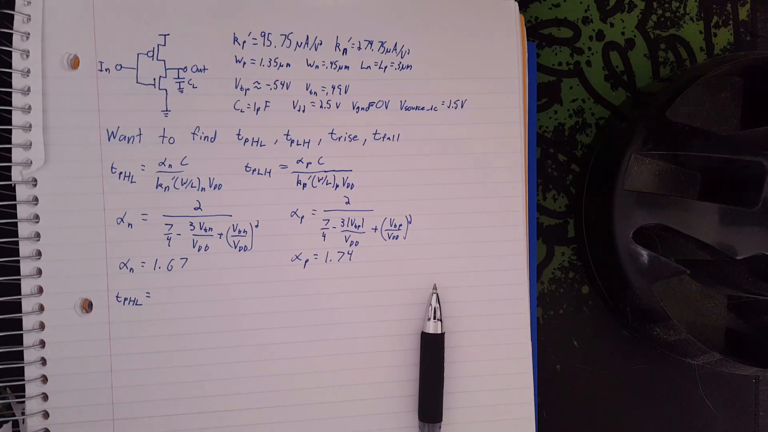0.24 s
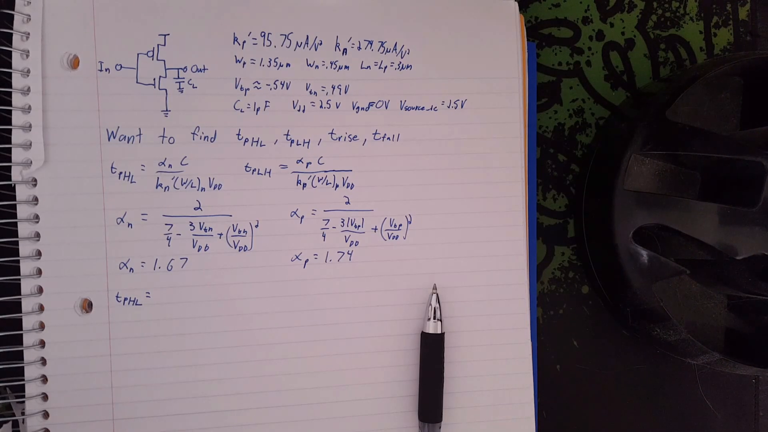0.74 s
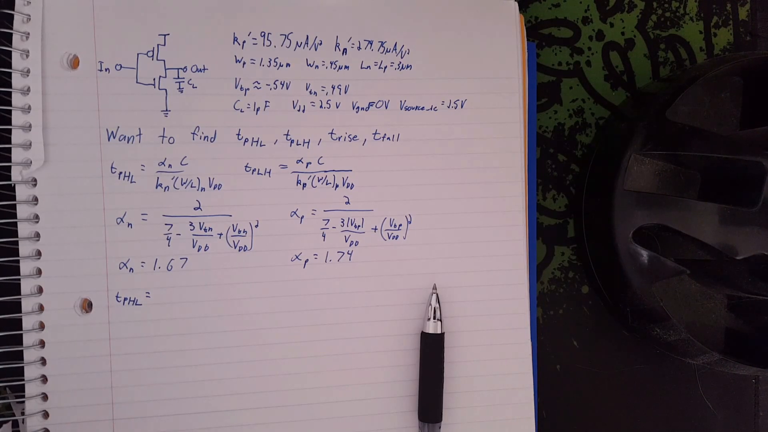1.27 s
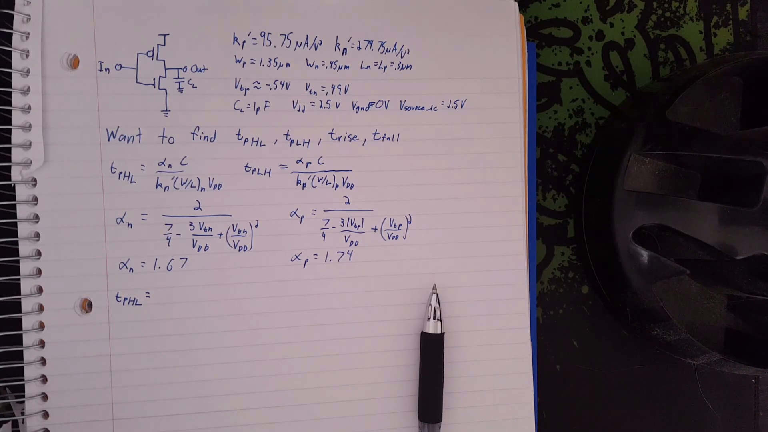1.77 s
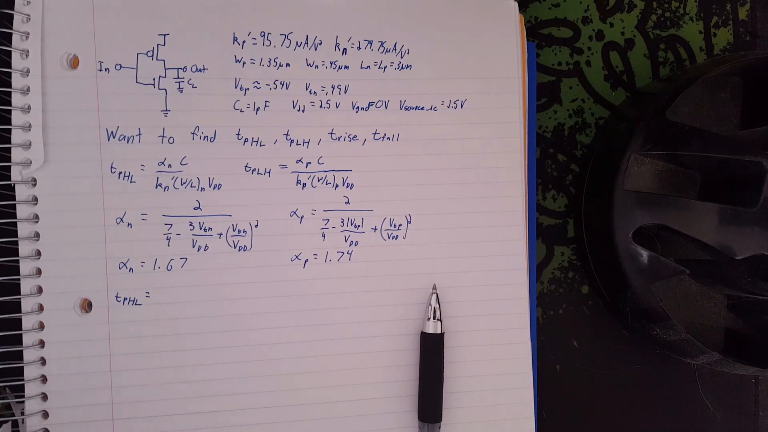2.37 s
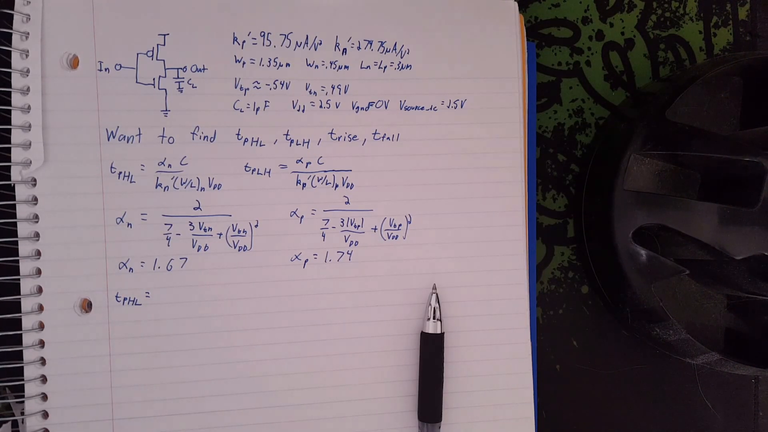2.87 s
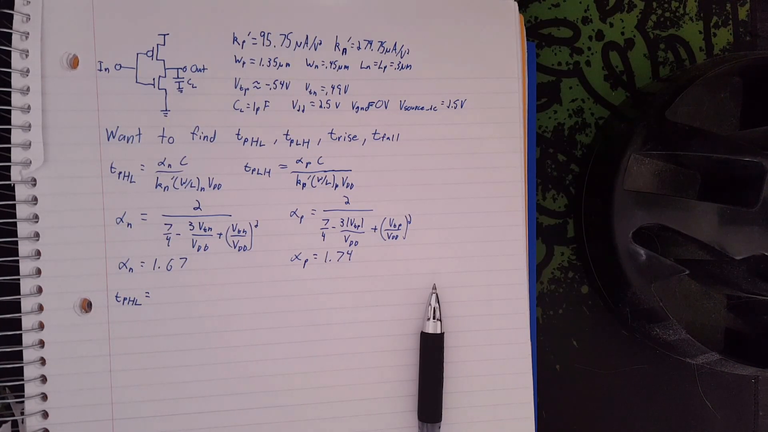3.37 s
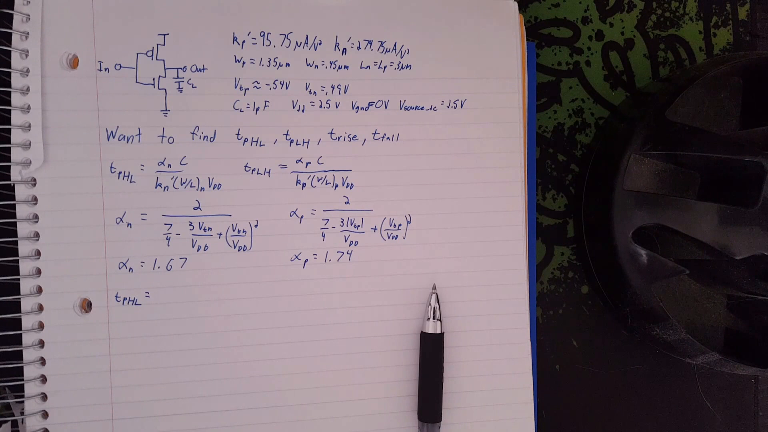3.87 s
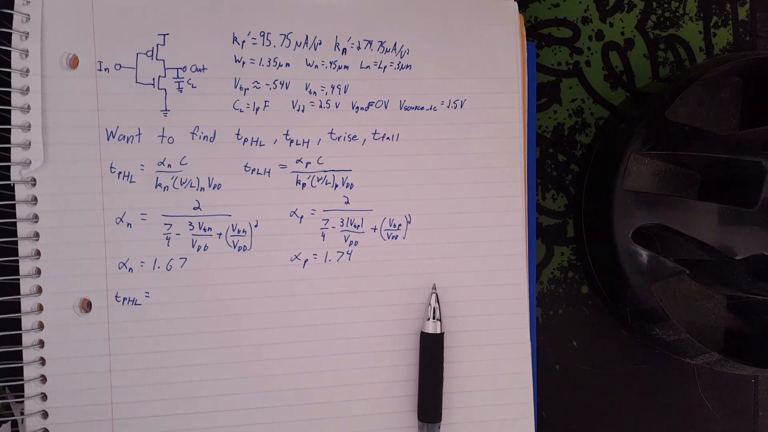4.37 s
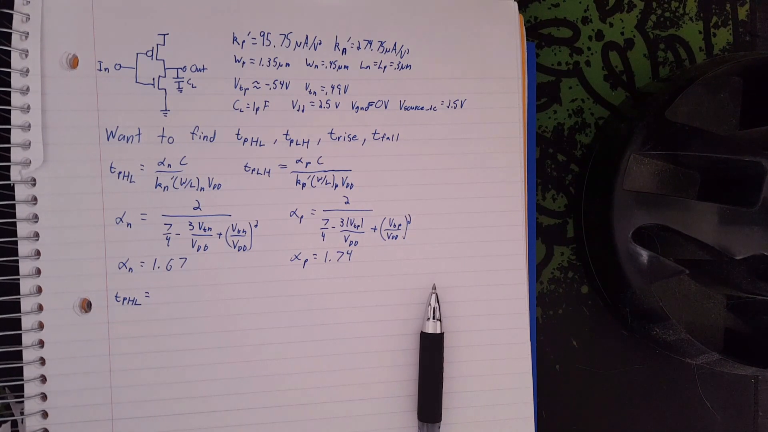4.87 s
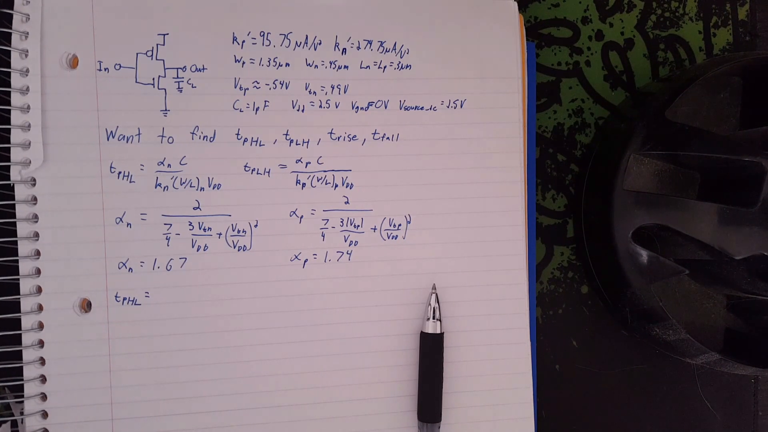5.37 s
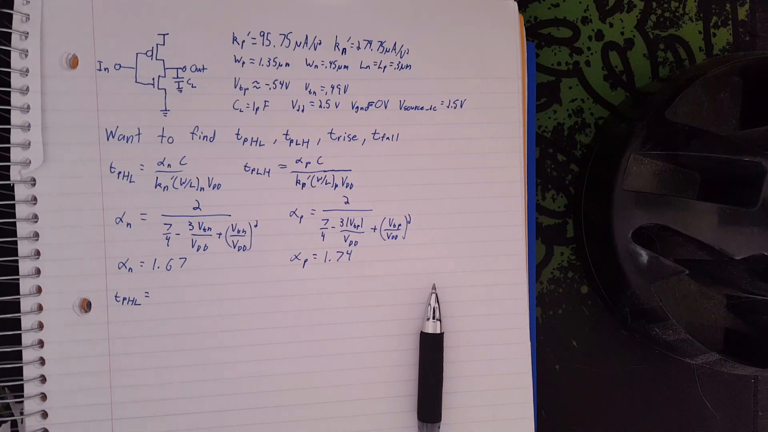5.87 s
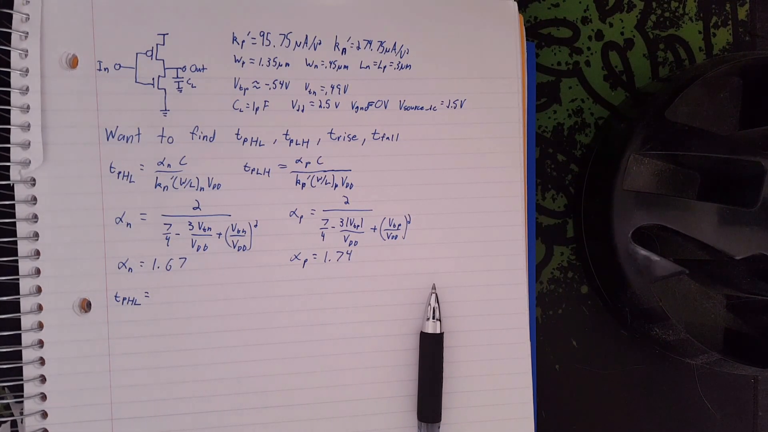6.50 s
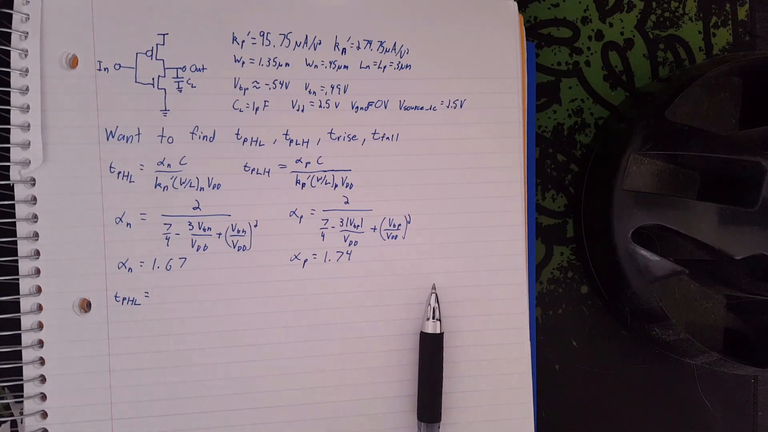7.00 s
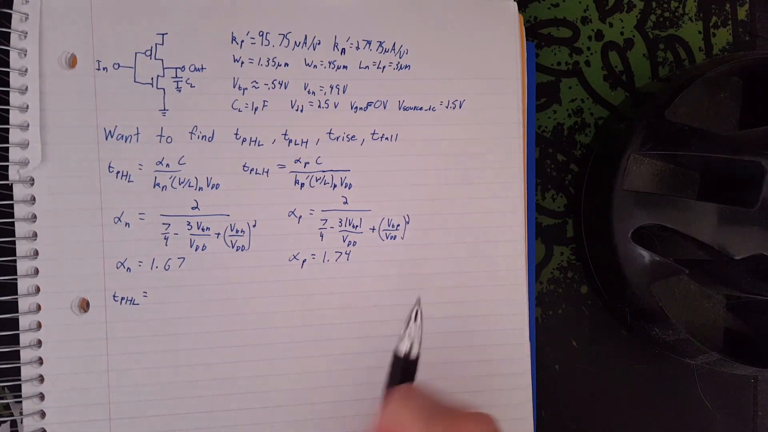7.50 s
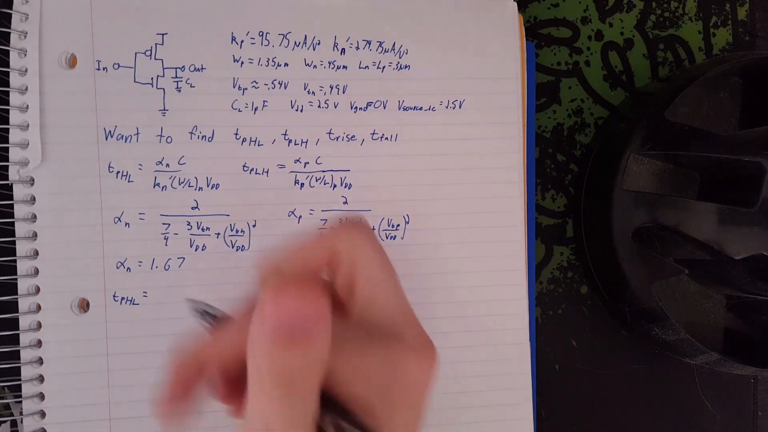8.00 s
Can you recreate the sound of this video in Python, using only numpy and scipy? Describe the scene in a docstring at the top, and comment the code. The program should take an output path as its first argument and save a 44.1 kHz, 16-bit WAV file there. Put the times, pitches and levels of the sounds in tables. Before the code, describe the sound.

Small calculator keys click unevenly in a quiet humming room as a far engine swells and fades, then a pen scrapes up and something knocks hard on the desk.

```python
"""Calculator keys in a quiet room

Calculator keys are pressed and let go beside two microphones: short dying rings, with a noise tick on release.
A low hum and hiss lie beneath. A far engine, made of shaped noise and wavering sines, swells and fades.
Then a hand picks a pen off a notebook (grainy noise and plastic ticks), and something hard is set down
on the desk: dying desk rings with snaps of noise. Sparse echoes add the room to keys, knocks and pen."""
import sys
import numpy as np
from scipy import signal
from scipy.fft import rfft, irfft
from scipy.io import wavfile
from scipy.ndimage import uniform_filter1d

SR = 44100
rng = np.random.default_rng(int(sys.argv[2]) if len(sys.argv) > 2 else 0)


def materialize(psi):
    """Save the field psi as 16-bit PCM at rate SR to the path in sys.argv[1].

    A 1-D psi becomes a single channel; in a 2-D psi each row is a channel.
    """
    bounded = np.clip(np.atleast_2d(psi).T, -1, 1)
    quanta = np.round(bounded * 32767).astype(np.int16)
    wavfile.write(sys.argv[1], SR, quanta)


N = 363820  # length of the scene in samples
LAG = 14  # samples by which the right microphone hears later


def amp(db):
    """Turn decibels into a plain gain."""
    return 10 ** (np.asarray(db) / 20)


def evened(x):
    """Scale to an overall RMS of 1."""
    return x / np.sqrt(np.mean(x ** 2) + 1e-20)


def read(points, hz):
    """Read a two-column curve at any frequency, along a logarithmic pitch axis."""
    f, value = np.transpose(points)
    return np.interp(np.log(hz + 1), np.log(f + 1), value)


def add(mix, s, sound):
    """Mix a sound in at s seconds, cut off where the scene ends."""
    part = mix[:, round(s * SR):][:, :sound.shape[1]]
    part += sound[:, :part.shape[1]]


def later(x):
    """Sound reaches the right microphone a little later than the left."""
    return np.array([x[0], np.roll(x[1], LAG)])


def blend(a, b, same):
    """Keep a on the left; on the right mix in as much of the unrelated b as the likeness leaves."""
    same = np.clip(same, -1, 1)
    return np.array([a, same * a + np.sqrt(1 - same ** 2) * b])


# How alike steady noise is at the two microphones. Each row: frequency in Hz, left-right likeness (1 is identical).
LIKENESS = [(150, 0.97), (300, 0.53), (600, 0.8), (1200, 0.47), (3000, 0.0097), (9000, 0.015)]


def noise(colour, patchy_db, size=2048):
    """Two-channel noise from random short-time spectra; colour maps Hz to gain."""
    frames, hz = 4 * N // size + 5, np.fft.rfftfreq(size, 1 / SR)
    a, b, c, d, patches = rng.standard_normal((frames, len(hz), 5)).T
    # smoothed over pitch and time, the patches make the noise uneven
    patches = uniform_filter1d(patches, size=9, axis=0)
    patches = evened(uniform_filter1d(patches, size=9, axis=1))
    spectra = blend(a + 1j * b, c + 1j * d, read(LIKENESS, hz)[:, None])
    spectra *= colour(hz)[:, None] * amp(patchy_db * patches)
    return evened(signal.istft(spectra, nperseg=size, noverlap=3 * size // 4)[1][:, :N])


def wander(slowest_hz, fastest_hz, count):
    """A smooth random drift: slow sines with random starting points, RMS 1."""
    t = np.arange(N) / SR
    speeds = np.geomspace(slowest_hz, fastest_hz, num=count)
    return evened(sum(np.sin(2 * np.pi * (f * t + rng.random())) for f in speeds))


def tone(hz, db, waver_db):
    """A sine whose level wanders, in parts up to a few times a second."""
    level = np.sqrt(2) * amp(db + waver_db * wander(.4, 7, 12))
    cycles = np.cumsum(hz + np.zeros(N)) / SR
    return level * np.sin(2 * np.pi * (cycles + rng.random()))


def ring(modes, rise_s, scatter_db, unlike, detune, length=4096):
    """Dying modes of peak 1; every blow lands elsewhere, and each microphone hears the modes a little otherwise."""
    hz, db, t60 = np.transpose(modes)[:, :, None]
    t = np.arange(length) / SR
    level_z, turn_z, side_z, pitch_z = rng.standard_normal((4, len(modes), 1))
    apart = unlike * np.clip(hz / 1000, 0, 1)  # the microphones differ more at higher pitch
    turn = apart * np.array([-turn_z, turn_z])
    side_db = 2 * apart * np.array([-side_z, side_z])
    waves = np.sin(2 * np.pi * hz * (1 + detune * pitch_z) * t + turn)
    levels = amp(db + scatter_db * level_z + side_db - 60 * t / t60)
    x = (levels * waves).sum(1)
    x *= 1 - np.exp(-(t / rise_s) ** 2)
    return x / abs(x).max()


def burst(colour, t60, same, rise_s):
    """A dense snap whose start has an RMS near 1: dying noise through a causal filter of the given colour."""
    t = np.arange(4096) / SR
    # a minimum-phase filter, so that nothing sounds before the blow
    log_gain = np.log(amp(read(colour, abs(np.fft.fftfreq(1024, 1 / SR)))))
    taps = np.fft.ifft(np.exp(np.conj(signal.hilbert(log_gain)))).real[:512]
    shape = amp(-60 * t / t60) * (1 - np.exp(-t / rise_s))
    a, b = rng.standard_normal((2, len(t))) * shape
    x = signal.fftconvolve(blend(a, b, same), taps[None], axes=1)[:, :len(t)]
    return x / np.sqrt((x ** 2).sum(1, keepdims=True) / (t60 * SR / 20))


# Colour of the still air and hiss. Each row: frequency in Hz, relative level in dB per Hz.
AIR_COLOUR = [(35, -19.5), (65, -6.5), (130, -4), (170, -11.5), (220, -8), (300, -19.5), (440, -16),
              (650, -21), (1100, -19.5), (2400, -29), (4500, -37), (9500, -42.5), (13500, -40)]
# Steady hum lines. Each row: frequency in Hz, middle level in dB, wavering in dB.
HUM_LINES = [(217.5, -67, 2.5), (1365, -85, 2.5)]


def room_tone():
    """Still air and microphone hiss are shaped noise; the hum lines are wavering sines."""
    air = amp(-57.5) * noise(lambda hz: amp(read(AIR_COLOUR, hz)), 1.8)
    return air + sum(tone(*line) for line in HUM_LINES)


PASS_S = 4.9  # a vehicle outside is nearest then
NEARING_S, LEAVING_S = 1, 2.17  # how slowly it comes and goes
RUMBLE_SWELL_DB = 2  # depth of the slow drift


def band(hz, width):
    """Noise through one resonance."""
    return noise(lambda f: 1 / (1 + ((f - hz) / (width / 2)) ** 2), 2.9, size=8192)


# Room resonances that the rumble fills. Each row: frequency in Hz, width in Hz, level in dB before drift,
# dB gained as the vehicle passes.
ROOM_BOOMS = [(68.4, 25, -66.5, 9), (129.7, 41, -65.5, 3.5), (266.6, 50, -78, 11), (457, 125, -79, 12.5),
              (920, 1900, -81.5, 17)]


def rumble():
    """Far traffic rumble booms in the room's resonances, drifting slowly and rising as the vehicle passes."""
    t = np.arange(N) / SR
    near = np.exp(-((t - PASS_S) / np.where(t < PASS_S, NEARING_S, LEAVING_S)) ** 2)
    swell_db = RUMBLE_SWELL_DB * wander(.2, 1.5, 8)
    out = np.zeros((2, N))
    for hz, width, db, gain_db in ROOM_BOOMS:
        out += amp(db + gain_db * near + swell_db) * band(hz, width)
    return out


# Rings of the calculator case, low and upper, before each stroke shifts them.
# Each row: frequency in Hz, relative level in dB, seconds to die by 60 dB.
LOW_CASE_MODES = [(924, -7, 0.039), (1210, 5, 0.012), (1447, 2.5, 0.013)]
UPPER_CASE_MODES = [(1867, 10, 0.022), (2196, 6, 0.027), (2647, 7, 0.014), (3180, 7, 0.008)]
KEY_DETUNE = .012  # typical share by which the rings shift from stroke to stroke


def case_rings(low_db, low_hz, upper_db, upper_hz, rise_s):
    """Low and upper rings of the case; each is strongest near the struck key's own pitch."""
    low_modes = [(low_hz if abs(f - low_hz) < 125 else f, db - 9 * abs(np.log2(f / low_hz)), t60)
                 for f, db, t60 in LOW_CASE_MODES]
    upper_modes = [(f, db - 16 * abs(np.log2(f / upper_hz)), t60) for f, db, t60 in UPPER_CASE_MODES]
    low = amp(low_db) * ring(low_modes, rise_s, 0.37, 0.71, KEY_DETUNE)
    upper = amp(upper_db) * ring(upper_modes, 0.47 * rise_s, 1.0, 0.089, KEY_DETUNE)
    # small left-right balances in dB
    return low * amp([[-1], [1]]), later(upper * amp([[-1.5], [1.5]]))


# A finger drives a key to its stop; levels are before the left-right balance.
# Each row: time in seconds, low ring in dB, strongest low ring in Hz, upper ring in dB.
KEY_PRESSES = [(0.69, -38, 1400, -42.5), (1.581, -43, 928, -54), (1.908, -44, 1170, -48),
               (3.195, -41, 1250, -56), (3.99, -40, 1430, -44.5), (4.237, -49, 1005, -58),
               (4.2618, -41.5, 1170, -47), (4.517, -41.5, 945, -55), (4.64, -37.5, 1160, -45)]
# A key springs back against the case; levels are before the left-right balance.
# Each row: time in seconds, tick in dB, low ring in dB, strongest low ring in Hz, upper ring in dB,
# strongest upper ring in Hz, tilt of the tick's colour in dB per octave.
KEY_RELEASES = [(0.8387, -46.5, -65, 940, -41, 2840, 5), (1.708, -38, -47.5, 1630, -40, 2120, 7),
                (2.036, -47, -47.5, 974, -50.5, 2300, 4), (3.3488, -51, -58, 940, -54.5, 2350, 4),
                (4.087, -36, -47, 1520, -44.5, 3220, 15), (4.092, -37.5, -46.5, 1550, -36.5, 2520, 8.5),
                (4.3885, -39.5, -40.5, 1400, -42.5, 2300, 5), (4.613, -38.5, -51, 1240, -39.5, 2370, 3.5),
                (4.7653, -43, -42, 917, -44.5, 2280, 1), (5.008, -40, -62, 1035, -47.5, 2250, 8)]
# Colour of the release tick before its tilt. Each row: frequency in Hz, relative level in dB.
TICK_COLOUR = [(2000, -11), (3500, -1), (4700, 0), (6300, 4), (8300, -4.5), (10200, -3.5), (13000, -9)]


def keys():
    """A press is dull, its upper ring struck twice (dome, then stop); a release adds a tick, shaded from the right."""
    out = np.zeros((2, N))
    for s, low_db, low_hz, upper_db in KEY_PRESSES:
        low, upper = case_rings(low_db, low_hz, upper_db, 1670, rise_s=0.0023)
        add(out, s - .0015, upper)
        add(out, s - .0006, low)
        add(out, s + 0.000826, upper)
    for s, tick_db, low_db, low_hz, upper_db, upper_hz, tilt_db in KEY_RELEASES:
        colour = [(hz, db + tilt_db * np.log2(hz / 7000)) for hz, db in TICK_COLOUR]
        tick = amp(tick_db) * burst(colour, 0.014, 0.15, .0001) * amp([[3], [-5]])
        low, upper = case_rings(low_db, low_hz, upper_db, upper_hz, rise_s=0.0014)
        add(out, s - .0001, later(tick) + low + upper)
    return out


# How long echoes last, before each source's own factor. Each row: frequency in Hz, seconds to die by 60 dB.
ECHO_T60 = [(100, 0.6), (400, 0.51), (1500, 0.51), (5000, 0.43), (12000, 0.28)]
# Each row: frequency in Hz, left-right likeness of the echoes (1 is identical).
ECHO_LIKENESS = [(150, .998), (350, .96), (700, .4), (1500, .15), (9000, .02)]


def tail(start, slow):
    """Sparse taps of random sign, each band dying at its own speed; the bass is alike in both microphones."""
    taps = np.zeros((2, SR))
    at = np.arange(start, SR - 20, 20)
    at = at + rng.integers(0, 20, (2, len(at)))
    np.put_along_axis(taps, at, rng.choice([-1., 1.], at.shape), 1)
    hz, t, z = signal.stft(taps, SR, nperseg=512)
    fade = amp(-60 * t / (slow * read(ECHO_T60, hz)[:, None]))
    a, b = rfft(signal.istft(z * fade, SR, nperseg=512)[1][:, :SR])
    echoes = irfft(blend(a, b, read(ECHO_LIKENESS, np.fft.rfftfreq(SR, 1 / SR))), SR)
    return echoes * (np.arange(SR) >= start) / np.linalg.norm(echoes[0])


def room(x, start, slow, bass_db):
    """Bass takes one path; treble alternates between two, so that its echoes blend without ringing."""
    x = x.mean(0)
    bass = signal.sosfiltfilt(signal.butter(2, 900, fs=SR, output="sos"), x)
    treble = x - bass
    turn = 2 * np.pi * 170 * np.arange(N) / SR  # 170 turns a second
    paths = amp(bass_db) * bass + treble * np.cos(turn), treble * np.sin(turn)
    return sum(signal.fftconvolve(p[None], tail(start, slow), axes=1)[:, :N] for p in paths)


CYCLE_HZ, SAG_HZ_PER_S = 24.0, .9  # engine cycle at the nearest moment; it sinks steadily
# Engine orders swell and fade, mostly together, with one later swell.
# Each row: order (multiple of the cycle), loudest time in seconds, seconds to fall by 10 dB, peak in dB before wavering.
ENGINE_ORDERS = [(3, 4.8, 1.25, -54.5), (6, 4.6, .5, -64), (6, 5.45, .4, -58), (8, 4.6, .6, -65),
                 (10, 4.7, .7, -65)]
# Low tones that swell and stop; levels are before wavering.
# Each row: start in seconds, length in seconds, first pitch in Hz, last pitch in Hz, first level in dB, last level in dB.
LOW_DRONES = [(4.198, 1.85, 127.7, 109, -66, -56.5), (6.09, 0.305, 72.2, 73.5, -63, -53)]
DRONE_BEND, DRONE_EDGE_S = 1.5, 0.027  # curve of the glide; fade just outside each end


def engine():
    """Low orders of a far engine are sines at multiples of its sinking cycle; low tones glide beside them."""
    t = np.arange(N) / SR
    cycle_hz = CYCLE_HZ - SAG_HZ_PER_S * (t - PASS_S)
    out = np.zeros(N)
    for order, s, half, db in ENGINE_ORDERS:
        out += tone(order * cycle_hz, db - 10 * ((t - s) / half) ** 2, 1.6)
    for s, length, first_hz, last_hz, first_db, last_db in LOW_DRONES:
        u = np.clip((t - s) / length, 0, 1)  # progress from 0 to 1
        edge = np.clip(np.minimum(t - s, s + length - t) / DRONE_EDGE_S + 1, 0, 1)
        hz = first_hz + (last_hz - first_hz) * u ** DRONE_BEND
        out += edge * tone(hz, first_db + (last_db - first_db) * u, 0.61)
    return out


# Hand and pen sliding on paper.
# Each row: start in seconds, length in seconds before the fall, level in dB, treble in dB against the dull part.
PAPER_STROKES = [(5.54, 0.11, -69.5, 6), (7.3, 0.12, -50.5, -2.5), (7.42, 0.22, -62, -2.5),
                 (7.723, 0.32, -58.5, 2), (8.053, 0.1, -58.5, -1.5), (8.169, 0.1, -57.5, -2)]
# Colour of the rubbing. Each row: frequency in Hz, relative level in dB per Hz.
RUB_COLOUR = [(200, 2.5), (400, -1.5), (1000, -2.5), (2300, -8), (4000, -14), (8000, -18.5), (13000, -16.5)]
STROKE_RISE_S, STROKE_FALL_S = 0.04, 0.023
GRAINS_PER_S, GRAIN = 500, .35  # how often paper fibres catch and let go, and how strongly


def rustle():
    """Grainy friction noise; each stroke rises, holds and stops, with its own share of treble."""
    t = np.arange(N) / SR
    x = noise(lambda hz: amp(read(RUB_COLOUR, hz)), 0.85, size=256)
    hits = rng.exponential(1, N) * (rng.random(N) < GRAINS_PER_S / SR)
    catches = signal.oaconvolve(hits, np.hanning(70), "same")
    x = evened(x * (1 + GRAIN * evened(catches)))
    dull = signal.sosfilt(signal.butter(2, 4000, fs=SR, output="sos"), x)
    out = np.zeros((2, N))
    for s, length, level_db, bright_db in PAPER_STROKES:
        rise = np.clip((t - s) / STROKE_RISE_S, 0, 1)
        fall = np.exp(-np.maximum(t - s - length, 0) / STROKE_FALL_S)
        out += amp(level_db) * rise * fall * (dull + amp(bright_db) * (x - dull))
    return out


# Blows on the desk. Each row: time in seconds, force in dB, hardness of the contact in dB, deep thump in dB,
# ring that the struck spot favours in Hz.
DESK_BLOWS = [(7.2233, -31, -11, -34.5, 228), (7.25, -39, -8.5, -49, 450), (7.259, -31.5, -43, -42, 530),
              (7.285, -35, -23, -34.5, 233), (7.298, -48, -23, -35.5, 99), (7.425, -48.5, -9, -60, 1100),
              (7.6884, -8.5, -4.5, -28, 403), (7.6983, -11, -29, -19, 420), (7.756, -19.5, -17, -36, 410),
              (7.762, -21.5, -5, -21.5, 224), (7.814, -48, -20, -31, 224)]
# Deep and board rings of the desk, before small random shifts.
# Each row: frequency in Hz, relative level in dB, seconds to die by 60 dB.
DEEP_MODES = [(103, -21, 0.065), (120.2, 6.5, 0.11), (138.4, 5.5, 0.081), (221.6, 4, 0.11),
              (277.4, -7, 0.12)]
BOARD_MODES = [(410.6, -1, 0.16), (439.6, 1.5, 0.21), (511.6, -2, 0.13), (642, -6, 0.26),
               (383, 15.5, 0.0079), (975, 9, 0.11), (1150, 9, 0.066)]
# Colours of the hard thing's clack and the contact's crack. Each row: frequency in Hz, relative level in dB.
CLACK_COLOUR = [(150, -24.5), (700, 2.5), (1100, 5.5), (1600, -3), (2600, -10), (4000, -24)]
CRACK_COLOUR = [(400, -5), (1500, 7), (3200, 3), (5500, -8.5), (9000, -22), (12500, -18), (14500, -3)]
SPOT_DB_PER_OCTAVE = 12  # modes far from the favoured ring are struck more weakly
CLACK_DB, CLACK_SHARE = -6.5, 0.2  # the clack takes a share of the hardness, the crack all of it


def favoured(modes, spot_hz):
    """Weaken the modes that lie far from the ring favoured by the struck spot."""
    return [(f, db - SPOT_DB_PER_OCTAVE * abs(np.log2(f / spot_hz)), t60) for f, db, t60 in modes]


def knocks():
    """The desk top thuds in dying modes, the hard thing clacks and the contact cracks as snaps of noise."""
    out = np.zeros((2, N))
    for s, force_db, hard_db, thump_db, spot_hz in DESK_BLOWS:
        deep = ring(favoured(DEEP_MODES, spot_hz), 0.00237, 0.73, 0.54, 0.0061, length=SR // 2)
        board = ring(favoured(BOARD_MODES, spot_hz), .0008, .7, .3, .004, length=SR // 2)
        clack = later(burst(CLACK_COLOUR, 0.088, 0.11, 0.00049))
        crack = later(burst(CRACK_COLOUR, 0.019, 0.53, 0.00071))
        # each part but the deep one has its own left-right balance in dB
        add(out, s, -amp(thump_db) * deep)
        add(out, s, -amp(force_db) * board * amp([[.6], [-.6]]))
        add(out, s, amp(force_db + CLACK_DB + CLACK_SHARE * hard_db) * clack * amp([[-1.3], [1.3]]))
        add(out, s, amp(force_db + hard_db) * crack * amp([[4], [-4]]))
    # a high-pass thins the deep bass of the knocks
    return signal.sosfilt(signal.butter(2, 70, "high", fs=SR, output="sos"), out)


# The pen's barrel ticks in the hand.
# Each row: time in seconds, level in dB, treble in dB (the colour below sets it some 4 dB lower).
BARREL_TICKS = [(7.281, -41, -4), (7.293, -38, 3), (7.366, -47, -14), (7.413, -49, -6), (7.622, -44.5, -21),
                (7.898, -32, -11.5), (8.179, -51, -2)]


def pen():
    """Short plastic ticks: snaps of noise, each with its own share of treble."""
    out = np.zeros((2, N))
    for s, db, treble_db in BARREL_TICKS:
        colour = [(1200, -9), (2300, 2), (3500, -7.0), (5500, treble_db - 4.0), (13000, treble_db - 4.5)]
        add(out, s, amp(db) * burst(colour, 0.012, 0.6, 0.00012))
    return out


def scene():
    """Near sounds with their echoes, over the rustle and the far background."""
    pressed, struck = keys(), knocks() + pen()
    wet = amp(-7.5) * room(pressed, start=400, slow=.8, bass_db=-5)  # start in samples
    wet = wet + amp(-1.5) * room(struck, start=300, slow=0.88, bass_db=-8.5)
    far = room_tone() + rumble() + engine()
    return pressed + struck + wet + later(rustle()) + later(far * amp([[.3], [-.3]]))


# Treble fall of the whole sound. Each row: frequency in Hz, level in dB.
TREBLE_FALL = [(14300, -1.5), (14800, -18), (15800, -52)]
EDGE_HZ = 15800  # upper band limit


def record(dry):
    """The top treble falls away, then a steep low-pass limits the band."""
    hz = np.linspace(0, SR / 2, 257)
    gains = amp(read(TREBLE_FALL, hz)) * (hz < SR / 2)
    heard = signal.oaconvolve(dry, signal.firwin2(255, hz, gains, fs=SR)[None], "same", axes=1)
    limit = signal.firwin(511, EDGE_HZ, window=("kaiser", 9), fs=SR)
    return signal.oaconvolve(heard, limit[None], "same", axes=1)


dry = scene()
out = record(dry)
materialize(out)
```